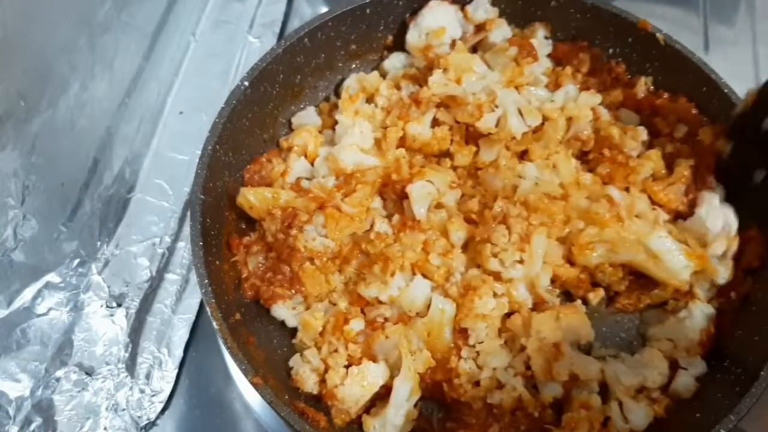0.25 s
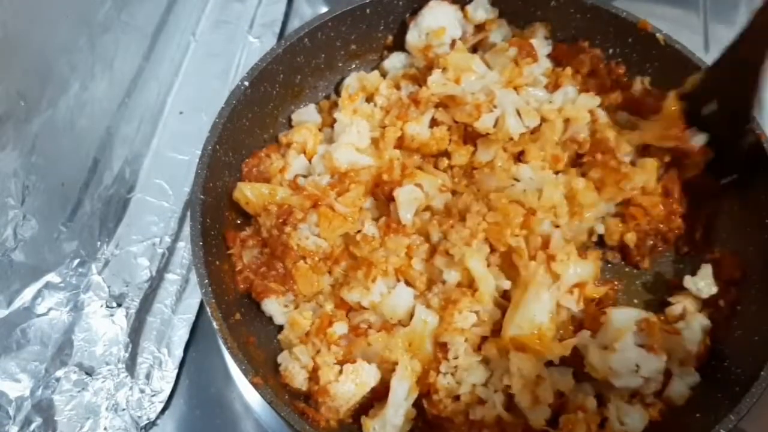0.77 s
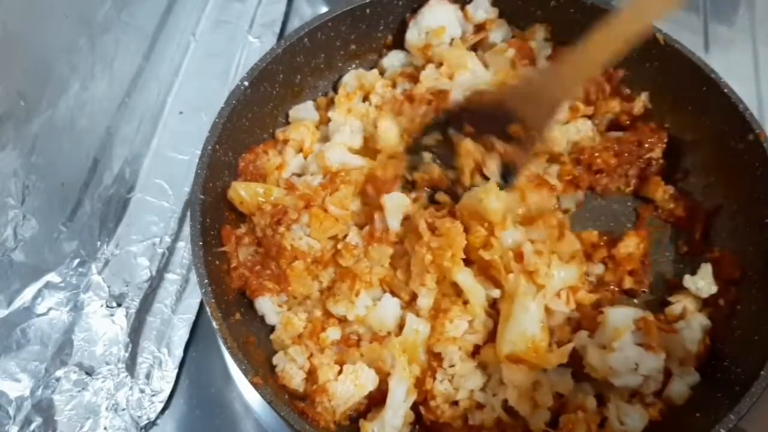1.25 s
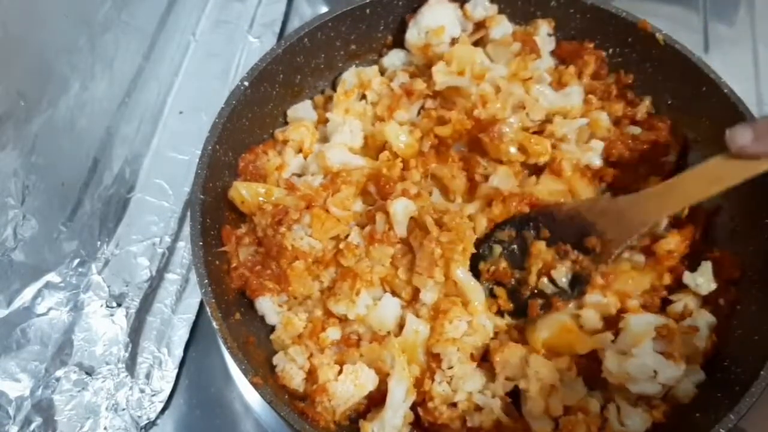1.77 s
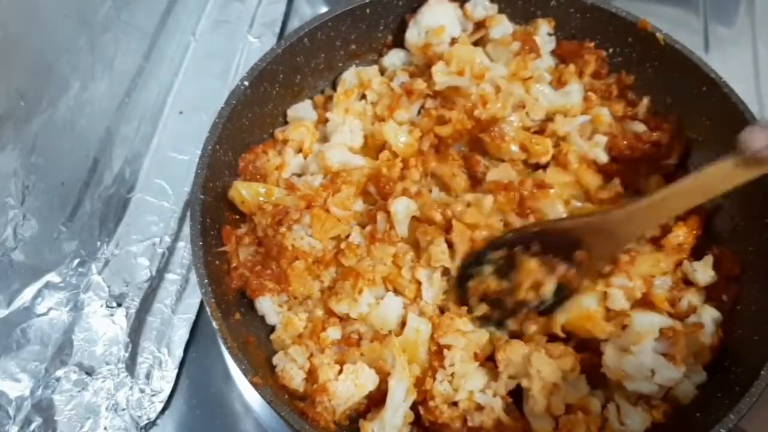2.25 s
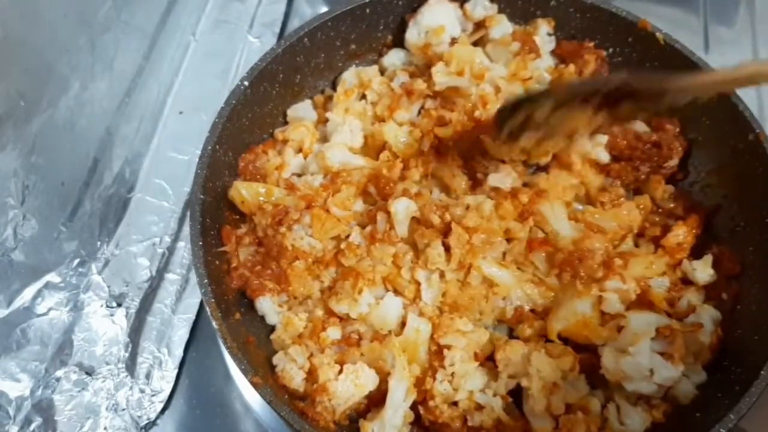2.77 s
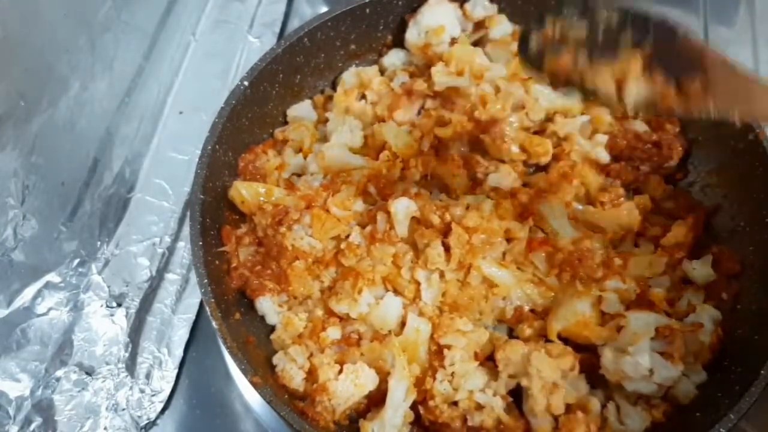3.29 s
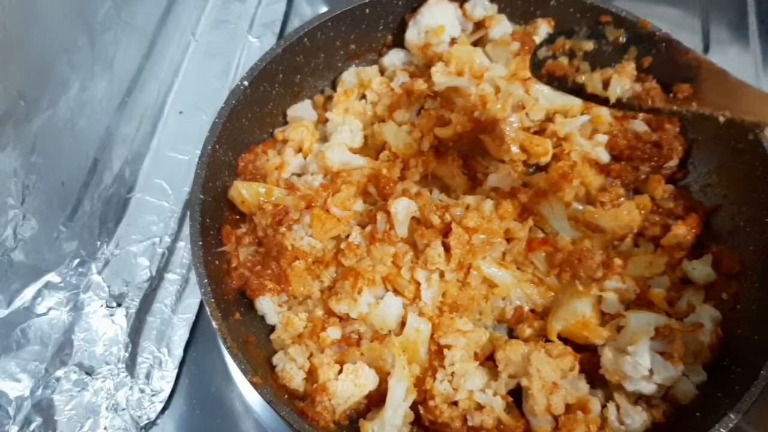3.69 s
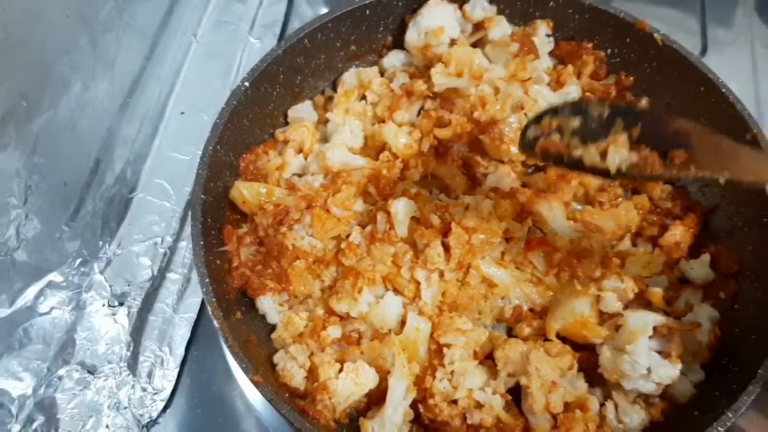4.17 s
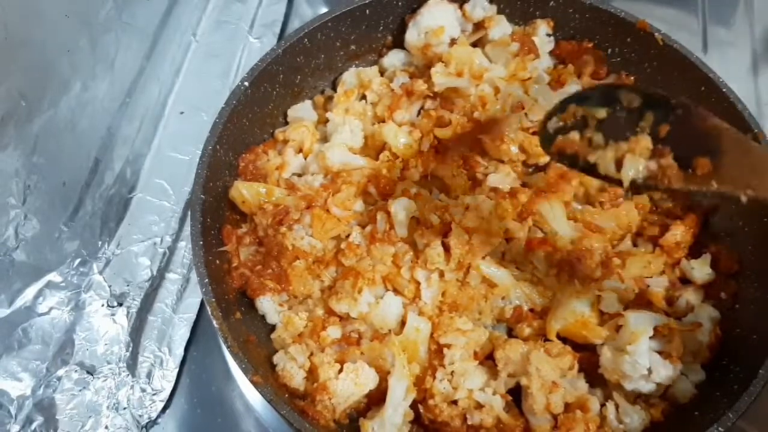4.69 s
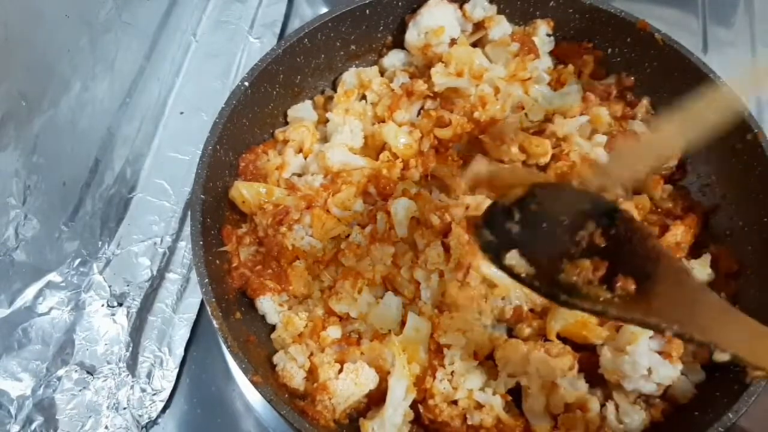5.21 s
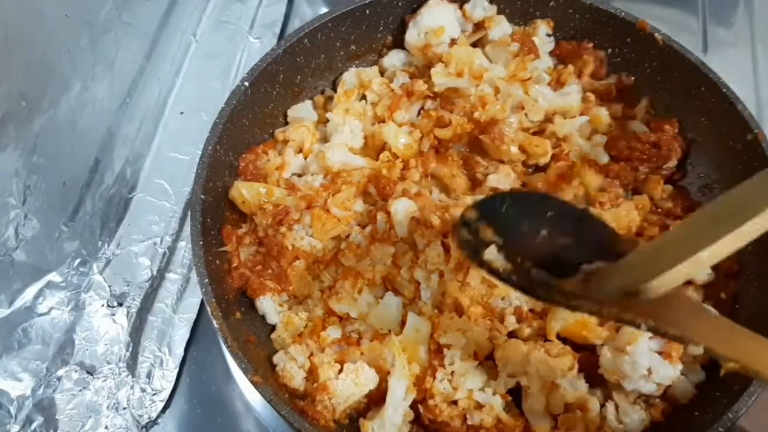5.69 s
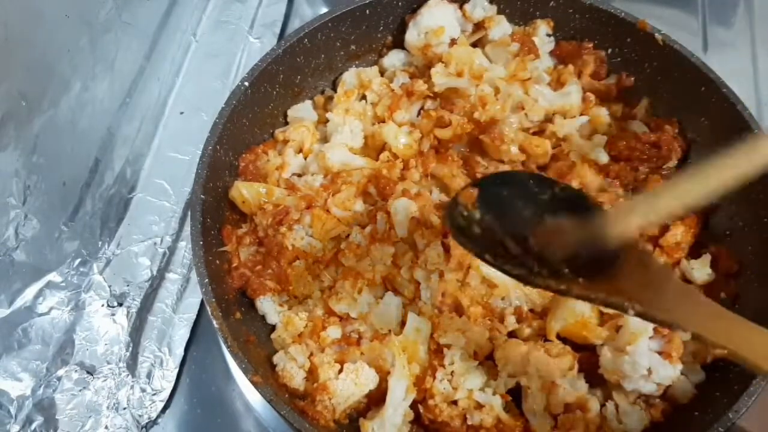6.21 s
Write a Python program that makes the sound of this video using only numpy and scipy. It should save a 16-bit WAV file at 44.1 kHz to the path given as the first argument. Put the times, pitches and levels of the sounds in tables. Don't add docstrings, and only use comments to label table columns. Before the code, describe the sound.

A wooden spoon scrapes and squelches through wet food in a pan, knocks loudly on the rim, clanks the stove, then is scraped clean with a stick.

```python
import sys
import numpy as np
from scipy import signal
from scipy.fft import rfft, irfft, next_fast_len
from scipy.io import wavfile
from scipy.ndimage import uniform_filter1d

SR = 44100
rng = np.random.default_rng(int(sys.argv[2]) if len(sys.argv) > 2 else 0)


def convert_level_to_amplitude(level_db):
    exponent = np.asarray(level_db, float) / 20
    return 10 ** exponent


def materialize(psi):
    bounded = np.clip(np.atleast_2d(psi).T, -1, 1)
    quanta = np.round(bounded * 32767).astype(np.int16)
    wavfile.write(sys.argv[1], SR, quanta)


N = 284445
T = np.arange(N) / SR

# (f/Hz, width/Hz, level/dB)
PAN_WOOD = [(660, 420, 5), (1130, 370, -2.5), (1476, 210, 4.5), (2020, 380, 1), (2500, 300, -3.5)]
PAN_BODY = [(267, 65, 1), (289, 14, -0.39), (404, 54, -2.2)]
HISS = [(3355, 1600, 1), (4560, 2100, -1), (6750, 4100, -1), (11700, 6200, -6)]


def colour(x, gain):
    size = next_fast_len(x.shape[-1], True)
    f = np.arange(size // 2 + 1) * SR / size + 1
    return irfft(rfft(x, size) * gain(f), size)[..., :x.shape[-1]]


def peaks(table):
    def gain(f):
        power = 0
        for hz, width_hz, db in table:
            detune = (f / hz - hz / f) * hz / width_hz
            power = power + convert_level_to_amplitude(2 * db) / (1 + detune ** 2) ** 2
        return np.sqrt(power)
    return gain


def unit(x):
    return x / np.sqrt(np.mean(x ** 2))


def walk(rate):
    k = int(SR / rate)
    held = rng.standard_normal(N // 20)[np.arange(N) // k]
    return unit(uniform_filter1d(uniform_filter1d(held, k), k))


def ports(x, pan_db, count):
    return np.array([np.roll(x, count) * convert_level_to_amplitude(pan_db / 2), x * convert_level_to_amplitude(-pan_db / 2)])


def grit(rate, spread_db, smooth):
    place = rng.random(N // 10)
    sign = rng.standard_normal(N // 10)
    size = rng.exponential(size=N // 10)
    used = int(rate * N / SR)
    slips = np.zeros(N)
    slips[(place[:used] * N).astype(int)] = (sign * convert_level_to_amplitude(spread_db * np.minimum(size, 5.5)))[:used]
    return unit(unit(slips) + smooth * rng.standard_normal(N))


def strokes(rows, share=False):
    power = np.zeros(N)
    for s, db, rise, fall, rel_db in rows:
        on = slice(max(int((s - 3 * rise) * SR), 0), int((s + 3 * fall) * SR))
        before, after = (s - T[on]) / max(rise, .002), (T[on] - s) / max(fall, .002)
        away = np.where(T[on] < s, before, after)
        power[on] += convert_level_to_amplitude(2 * (db + share * rel_db - 20 * away))
    return np.sqrt(power)


def rubbed(rub, table):
    return unit(colour(rub, peaks(table)))


def play(rows, first, second):
    return strokes(rows) * first + strokes(rows, share=True) * second


def blows(events, modes, crack, scatter_db, count):
    out, t = np.zeros((2, N)), T[:SR // 2]
    hz, db, t60 = np.transpose(modes)[:, :, None]
    shapes = convert_level_to_amplitude(db - 60 * t / t60) * np.sin(2 * np.pi * hz * t)
    crack_hz, width_hz, crack_db, decay, splash_db = crack
    band = signal.iirpeak(crack_hz, crack_hz / width_hz, fs=SR)
    radiate = signal.butter(2, max(210, .6 * hz.min()), "high", fs=SR)
    chance = rng.standard_normal((len(events), len(modes)))
    for (s, peak_db, pan_db, contact_ms), c in zip(events, chance):
        ring = convert_level_to_amplitude(scatter_db * c) @ shapes
        ring = ring / np.abs(ring).max()
        burst = rng.standard_normal((2, len(t))) * np.exp(-t / decay)
        splash = convert_level_to_amplitude(splash_db) * signal.lfilter([1, -2, 1], 1, burst)
        mid, side = signal.lfilter(*band, signal.lfilter(*band, burst)) + splash
        rattle = mid + 0.92 * np.array([side, -side])
        blow = ports(ring, pan_db, count=count) + convert_level_to_amplitude(crack_db) * rattle
        soft = np.exp(-1000 / (max(contact_ms, .01) * SR))
        blow = signal.lfilter(*radiate, signal.lfilter([1 - soft], [1, -soft], blow))
        i = int(s * SR)
        out[:, i:i + len(t)] += convert_level_to_amplitude(peak_db) * blow[:, :N - i]
    return out


def ticks(rows):
    out, t = np.zeros((2, N)), T[:SR // 20]
    for s, peak_db, hz, pan_db in rows:
        click = np.diff(rng.standard_normal(len(t) + 1)) * np.exp(-t / 0.00093)
        pop = np.sin(2 * np.pi * hz * t) * np.exp(-t / 0.0015) + convert_level_to_amplitude(-4.0) * click
        i = int(s * SR)
        out[:, i:i + len(t)] += ports(convert_level_to_amplitude(peak_db) * pop, pan_db, count=0)
    return out


def swells(rows, calm_db):
    return convert_level_to_amplitude(calm_db) + sum(convert_level_to_amplitude(db) * np.exp(-((T - s) / half) ** 2) for s, db, half in rows)


def floor():
    # (f/Hz, level/dB per Hz)
    spectrum = [(25, -32.5), (47, -11.5), (80, -15.5), (200, -11.5), (290, -23), (420, -27.5), (560, -38.5),
                (1000, -44.5), (1500, -38.5), (2600, -42), (3900, -37), (6400, -43), (9500, -45.5),
                (12500, -43)]
    # (t/s, level/dB)
    sizzle = [
        (0.0, -74),
        (0.3, -71.5),
        (.55, -73.5),
        (0.88, -68.5),
        (1.38, -73),
        (2.3, -73),
        (3.6, -75.5),
        (4.17, -68),
        (4.7, -77.5),
        (6.45, -75.5),
    ]
    hz, db = np.transpose(spectrum)
    shape = lambda f: convert_level_to_amplitude(np.interp(np.log(f), np.log(hz), db))
    mid = rng.standard_normal(N)
    side = colour(rng.standard_normal(N), lambda f: np.clip(f / 900, .25, 1))
    air = colour(np.array([mid + side, mid - side]), lambda f: shape(f) / (1 + (f / 2500) ** 2))
    air = air * convert_level_to_amplitude(0.67 * walk(2.4))
    grains = np.array([grit(2700, 2.5, 1.4), grit(3000, 3.9, 1.5)])
    fizz = colour(grains, lambda f: shape(f) / (1 + (2500 / f) ** 2))
    breath = unit(convert_level_to_amplitude(np.interp(T, *np.transpose(sizzle))))
    return convert_level_to_amplitude(-27) * (air + convert_level_to_amplitude(9.5) * fizz * breath)


def rumble():
    modes_hz = [104.4, 69, 147.3, 202.2, 265]
    trims_db = [0, 0, -0.5, -8, -14.5]
    calms_db = [-63, -72, -64, -64.5, -63]
    # (t/s, peak level/dB, half length/s)
    main = [(0.233, -52.5, 0.077), (0.755, -47, 0.077), (0.924, -47.5, 0.066), (1.277, -50, 0.12),
            (1.64, -48, 0.063), (2.01, -51.5, 0.11), (2.42, -54.5, 0.22), (2.694, -44, 0.043),
            (2.885, -46.5, 0.08), (3.174, -46.5, .1), (3.422, -55, .07), (3.749, -49, 0.054),
            (3.96, -56, 0.061), (4.29, -46, 0.057), (4.597, -57, 0.084), (4.853, -57.5, 0.12),
            (5.086, -53, 0.041), (5.302, -52.5, 0.23), (5.837, -49.5, 0.066), (6.07, -49.5, 0.079),
            (6.353, -54.5, 0.11)]
    # (t/s, peak level/dB, half length/s)
    passes = [
        (0.304, -59, 0.4),
        (0.818, -52, 0.18),
        (1.253, -63, 0.22),
        (2.702, -54, 0.055),
        (4.154, -54.5, 0.097),
        (4.702, -64, 0.19),
        (5.797, -49.5, 0.28),
        (6.17, -50, .25),
    ]
    # (t/s, peak level/dB, half length/s)
    murmurs = [(.22, -62.5, 0.23), (.8, -53.5, 0.16), (1.2, -61, 0.2), (1.706, -57, 0.16),
               (2.048, -57.5, 0.18), (2.58, -54.5, 0.056), (2.72, -47.5, 0.042), (3.1, -55, 0.25),
               (4.13, -41, 0.075), (4.5, -60, 0.15), (5.201, -60, 0.21), (5.75, -59.5, 0.094),
               (6.05, -53, 0.15)]
    total = 0
    for rows, calm_db, db, hz in zip((main, passes, murmurs, murmurs, murmurs), calms_db, trims_db, modes_hz):
        force = swells(rows, calm_db)
        tone = np.sin(2 * np.pi * np.cumsum(hz + .025 * hz * walk(14)) / SR)
        total = total + force * tone * convert_level_to_amplitude(1.0 + db + 1.0 * walk(16))
    return ports(total, .6, count=4)


def spatter():
    # (t/s of most force, level/dB, rise/s, fall/s, unused level/dB)
    bursts = [
        (.25, -68, .08, .3, 0),
        (.36, -57.5, 0.22, .25, 0),
        (.72, -69, .05, .2, 0),
        (.85, -62, .15, 0.31, 3),
        (1.0, -67, .2, 0.24, 0),
        (1.3, -63, 0.19, 0.32, 0),
        (1.74, -60.5, 0.24, .2, 0),
        (2.19, -66, .2, 0.26, 0),
    ]
    # (f/Hz, width/Hz, level/dB)
    bands = [(7340, 2000, -2), (11800, 3500, 0), (14600, 1800, -4.5)]
    # (t/s, peak level/dB, pitch f/Hz, left
    # minus right level/dB)
    spits = [(.1017, -58, 11500, -1), (.2159, -51, 9500, -1.5), (.232, -52, 7860, -1),
             (.248, -55, 10800, 0), (.2967, -60, 14300, -1), (.336, -41, 2060, 0), (.3581, -50, 12300, 0),
             (.387, -51, 11500, 0), (.413, -50, 11400, 0), (.4873, -51, 14400, 1), (.5881, -58, 12500, .5),
             (.8046, -57, 11300, .5), (.8425, -55, 11800, -.5), (.9682, -53, 14000, .5),
             (1.0829, -50, 11300, 0), (1.1797, -54, 11900, -2), (1.3853, -51, 11500, 1.5),
             (1.6576, -55, 10800, 1.5), (1.6955, -54, 7850, .5), (1.7858, -59, 10900, -1),
             (1.8642, -55, 11300, -1), (1.9829, -58, 7130, .5), (2.1919, -56, 13000, .5),
             (2.2408, -59, 12000, .5)]
    crackle = np.array([grit(1500, 2.7, .8), grit(1500, 3.1, 0.86)])
    return strokes(bursts) * unit(colour(crackle, peaks(bands))) + ticks(spits)


def wet_ticks():
    # (t/s, peak level/dB, pitch f/Hz, left minus right level/dB)
    bubbles = [(0.2164, -58, 3720, -3), (0.4479, -50, 7840, -6.5), (0.6918, -40, 6850, 0),
               (0.6925, -43.5, 5220, -2), (0.8617, -44, 7200, -1.0), (0.9044, -45, 8240, 2),
               (1.0001, -47.5, 3650, 4), (1.059, -48, 8000, 2), (1.2645, -52, 5000, 5),
               (1.3344, -53, 7910, 1.5), (1.3648, -51, 2500, 6), (1.6784, -50.5, 7520, 3),
               (1.7594, -45, 5500, 0), (1.8223, -49.5, 5480, 1.5), (1.8637, -61, 3410, -1.5),
               (1.8931, -47, 2640, -2), (1.9174, -49, 2530, -4), (2.1253, -52, 5414, 2),
               (2.1345, -47, 4900, 0), (2.1736, -44, 4176, 3), (2.2066, -50, 2660, 4),
               (2.2444, -48, 4666, -4.5), (2.265, -44.5, 5120, 1), (2.4594, -56.5, 4035, -2.5),
               (4.4694, -54, 4260, -1), (4.6249, -57, 5100, -2)]
    return ticks(bubbles)


def stove_thuds():
    # (t/s, peak level/dB, left minus right level/dB, contact time/ms)
    thuds = [
        (.222, -40.5, -.5, 0.28),
        (.809, -29.5, .5, 0.16),
        (3.335, -45.5, -1.5, 0.3),
        (3.892, -46, 0, 0.44),
        (3.970, -30, 0, 0.3),
        (4.094, -1.6, -1, 0.12),
    ]
    # (f/Hz, level/dB, t60/s)
    modes = [(202.6, -5, 0.28), (264.2, -4, 0.4), (338, 2, 0.26), (440.7, 0.5, 0.18), (470, 0.5, 0.2),
             (539, -5, .12), (618, -4.5, 0.11), (680.5, 3, 0.13), (836, -13, 0.1), (1147, -4, 0.16),
             (1688, 9, 0.025), (2640, 0, .04), (3650, -8.5, .02), (5290, -19, .02)]
    # (f/Hz, width/Hz, level/dB, decay/s, splash level/dB)
    crack = (519, 1102, 1.5, 0.0214, -38)
    return blows(thuds, modes, crack, 0.73, count=2)


def stir(rub):
    # (t/s of most force, wood level/dB, rise/s, fall/s, hiss relative level/dB)
    rows = [
        (.235, -59, .02, .1, -3),
        (.272, -50.5, 0.06, .08, -10),
        (.36, -51.5, 0.091, 0.03, 0.5),
        (.4, -69.5, 0.035, 0.17, 9),
        (.811, -42, 0.0065, 0.078, -12.5),
        (.87, -47.5, 0.022, 0.026, -3),
        (.9, -61.5, 0.16, 0.17, 4.5),
    ]
    wood = rubbed(rub, PAN_WOOD) + convert_level_to_amplitude(1) * rubbed(rub, PAN_BODY)
    return play(rows, wood, rubbed(rub, HISS))


def squeak():
    # (t/s of most force, level/dB, rise/s, fall/s, unused level/dB)
    rows = [
        (.322, -56, 0.013, 0.041, 0),
        (.345, -41, 0.023, 0.029, 0),
    ]
    phase = 2 * np.pi * np.cumsum(2060 * (1 + 0.055 * walk(400))) / SR
    tone = np.sin(phase) + convert_level_to_amplitude(-9) * np.sin(1.45 * phase)
    return strokes(rows) * tone * convert_level_to_amplitude(3.0 + 4.2 * walk(300))


def spoon_bumps():
    # (t/s, peak level/dB, left minus right level/dB, contact time/ms)
    bumps = [
        (.692, -49.5, -1, 0.024),
        (2.902, -26.5, .5, 0.068),
        (2.984, -33, -1, 0.064),
        (2.994, -44, -1, 0.054),
        (3.064, -40, -1, 0.09),
        (3.136, -43, -1, .07),
        (3.356, -55, -1, 0.14),
    ]
    # (f/Hz, level/dB, t60/s)
    modes = [(423, -2, 0.036), (760, -1, 0.026), (1150, -15, 0.016), (1550, 2.5, 0.026), (2000, -6, 0.024)]
    # (f/Hz, width/Hz, level/dB, decay/s, splash level/dB)
    crack = (1200, 1600, -10.5, 0.06, -40)
    return blows(bumps, modes, crack, 2.7, count=1)


def turn_food(rub):
    # (t/s of most force, squelch level/dB, rise/s, fall/s, hiss relative level/dB)
    rows = [
        (1.27, -75.5, .1, 0.26, 11.5),
        (1.375, -67, .02, 0.12, -12),
        (1.48, -70, .15, .1, -14),
        (1.72, -66, .05, .15, 6),
        (1.765, -67, 0.13, 0.092, 8.5),
        (1.915, -66, .07, 0.047, 5.5),
        (2.14, -72.5, .04, 0.16, 11.5),
        (2.268, -67.5, 0.15, .02, 9.5),
    ]
    # (f/Hz, width/Hz, level/dB)
    wet = [(1496, 300, -2.5), (2054, 290, -1), (2675, 620, -6.5)]
    return play(rows, rubbed(rub, wet), rubbed(rub, HISS))


def rim_knocks():
    # (t/s, peak level/dB, left minus right level/dB, contact time/ms)
    knocks = [
        (2.688, -2, 1.5, 0.033),
        (2.815, -21, 7, 0.15),
    ]
    # (f/Hz, level/dB, t60/s)
    modes = [(282.5, 3.5, 0.23), (336.6, 1, 0.24), (200.5, -14, .15), (406.7, -7, 0.2),
             (500.5, -7.5, 0.054), (773.4, -7, 0.11), (915, -6.5, 0.062), (1302, -4, .035),
             (1722, 6.5, 0.03), (2015, 0.5, 0.028), (2485, 8, 0.033), (640, -10, .1), (3950, -8, 0.016),
             (6230, -1.5, 0.0079)]
    # (f/Hz, width/Hz, level/dB, decay/s, splash level/dB)
    crack = (4300, 3200, -16, 0.033, -21.5)
    return blows(knocks, modes, crack, 0.39, count=2)


def drag_on_rim(rub):
    # (t/s of most force, wood level/dB, rise/s, fall/s, hiss relative level/dB)
    rows = [
        (2.96, -60, 0.12, 0.31, -10),
        (3.17, -61, 0.33, 0.11, -5.5),
        (3.38, -71.5, 0.29, 0.11, -0.5),
        (3.72, -77, .05, .5, -2),
        (3.92, -66.5, 0.084, .3, -4),
        (4.055, -59, 0.22, 0.038, 2),
    ]
    wood = rubbed(rub, PAN_WOOD) + convert_level_to_amplitude(5.5) * rubbed(rub, PAN_BODY)
    return play(rows, wood, rubbed(rub, HISS))


def grate_clanks():
    # (t/s, peak level/dB, left minus right level/dB, contact time/ms)
    clanks = [
        (4.015, -36, -1, 0.071),
        (4.066, -7.5, 0, 0.037),
        (4.092, -8.5, .3, 0.0084),
    ]
    # (f/Hz, level/dB, t60/s)
    modes = [(1304, -5, 0.016), (2167, -4.5, 0.023), (2565, -1, 0.023), (2986, -9, 0.2), (3005, -9, 0.26),
             (4115, -14, 0.22), (4867, -21, 0.018), (5250, -8.5, 0.11), (5490, -14, 0.22),
             (5650, -7, 0.094), (6858, -25.5, 0.25), (7800, -21.5, .015)]
    # (f/Hz, width/Hz, level/dB, decay/s, splash level/dB)
    crack = (3000.5, 3499.5, -7.5, 0.0215, -23.5)
    return blows(clanks, modes, crack, .8, count=2)


def stick_taps():
    # (t/s, peak level/dB, left minus right level/dB, contact time/ms)
    taps = [
        (4.809, -18.5, 5, 0.0079),
        (4.819, -28, -10, 0.032),
        (5.283, -37.5, -9, 0.19),
        (5.342, -38, -12, 0.22),
        (5.626, -31, -12.5, 0.038),
        (5.945, -23, -12, 0.043),
        (6.232, -17, -5, 0.045),
        (6.243, -37, -6, 0.055),
    ]
    # (f/Hz, level/dB, t60/s)
    modes = [(808, -3, 0.018), (1200, 1, 0.012), (2050, -10, 0.021), (3074, 4, 0.015), (3450, 9, 0.012),
             (3800, 4, 0.015), (4700, 5, 0.013), (6100, 3, 0.011), (7300, -4, 0.008)]
    # (f/Hz, width/Hz, level/dB, decay/s, splash level/dB)
    crack = (4200, 3500, -7, 0.0015, -21)
    return blows(taps, modes, crack, 2.8, count=1)


def wipe(rub):
    # (t/s of most force, hiss level/dB, rise/s, fall/s, wood relative level/dB)
    rows = [(4.825, -50, .01, 0.22, -13), (4.935, -63.5, .015, 0.16, -2), (4.99, -59.5, 0.17, 0.032, -4.5),
            (5.05, -67, .01, 0.057, -6), (5.085, -63.5, 0.13, 0.059, -17), (5.35, -59, .02, 0.12, -7),
            (5.39, -56.5, 0.084, 0.099, -15), (5.44, -58.5, 0.24, 0.02, -7),
            (5.645, -57.5, 0.022, 0.12, -2), (5.71, -52.5, 0.073, 0.058, -6.5),
            (5.962, -52.5, 0.015, 0.094, 0.5), (6.02, -47, 0.052, 0.019, -0.5), (6.05, -72, .03, 0.12, -11),
            (6.247, -51, 0.0094, 0.11, 0), (6.32, -53.5, 0.075, 0.054, -4)]
    # (f/Hz, width/Hz, level/dB)
    stick_hiss = [(3220, 680, -0.5), (3720, 330, 1), (4460, 1100, 0), (6200, 2200, -3.5), (7660, 1100, -4),
                  (11500, 5100, -6)]
    spoon_wood = [(763, 400, 0), (1260, 440, -4.5), (1470, 215, 1.5), (2090, 1040, -6.5)]
    return play(rows, rubbed(rub, stick_hiss), rubbed(rub, spoon_wood))


def room(x):
    # (f/Hz, level/dB, t60/s)
    bands = [(153.8, -1, 0.57), (426.5, -4.5, 0.48), (1000, -1, 0.49), (2500, -2.5, 0.49),
             (5960, -3.5, 0.44), (12000, -8, 0.34)]
    t, tail = T[:SR * 2 // 3], 0
    for hz, db, t60 in bands:
        noise = rng.standard_normal((2, len(t)))
        mid, side = colour(noise, lambda f: np.exp(-(np.log(f / hz) / 0.64) ** 2))
        fade = convert_level_to_amplitude(db - 60 * t / t60) * np.clip((t - .003) / 0.0062, 0, 1)
        tail = tail + fade * (mid + np.clip(hz / 1200, .15, 1.25) * np.array([side, -side]))
    tail = tail / np.sqrt(np.sum(tail ** 2) / 2)
    return convert_level_to_amplitude(-4) * signal.oaconvolve(x.mean(axis=0)[None], tail, axes=1)[:, :N]


def scene():
    rub = grit(2500, 2.2, 0.94) * convert_level_to_amplitude(2.3 * walk(60))
    inside = ports(stir(rub) + turn_food(rub) + squeak(), .4, count=2) + wet_ticks()
    above = ports(drag_on_rim(rub) + wipe(rub), -.2, count=1) + stick_taps() + spoon_bumps()
    rim = rim_knocks()
    stove = grate_clanks() + stove_thuds()
    sent = convert_level_to_amplitude(-1.5) * rim + convert_level_to_amplitude(-7.0) * inside + convert_level_to_amplitude(-5.5) * above + convert_level_to_amplitude(1.5) * stove
    return inside + above + rim + stove + room(sent) + rumble() + floor() + spatter()


def roll_off(x):
    return signal.sosfilt(signal.butter(12, 16810, fs=SR, output="sos"), x)


def record(dry):
    bass_cut = signal.butter(1, 30, "high", fs=SR, output="sos")
    top_cut = signal.ellip(8, .3, 60, 15900, fs=SR, output="sos")
    rounded = np.tanh(1.1 * dry) / 1.102
    return roll_off(signal.sosfilt(np.vstack([bass_cut, top_cut]), rounded))


dry = scene()
out = record(dry)
materialize(out)
```